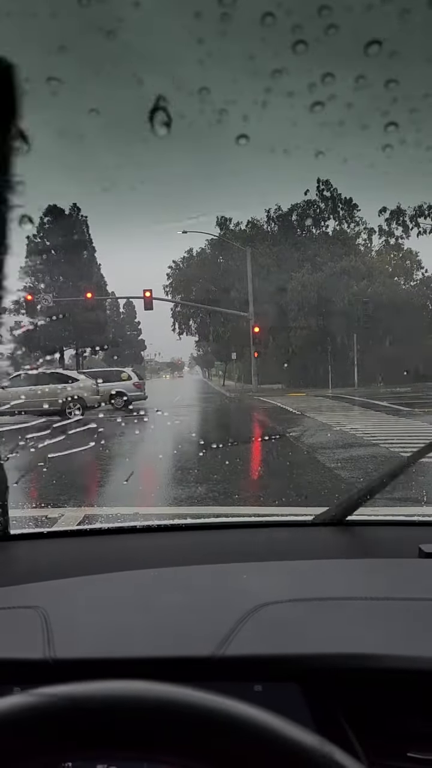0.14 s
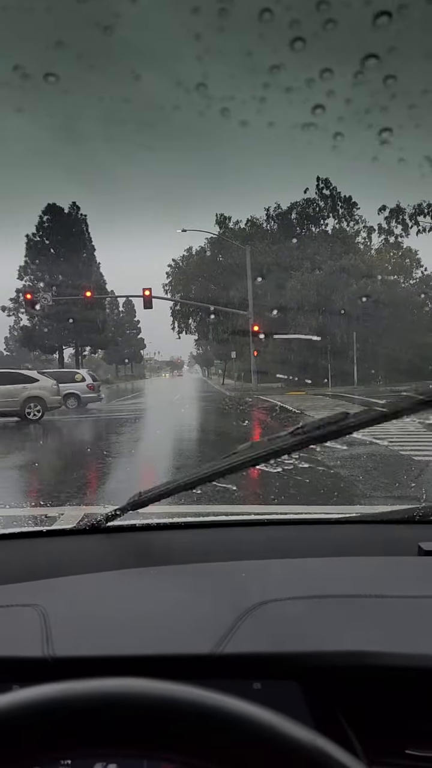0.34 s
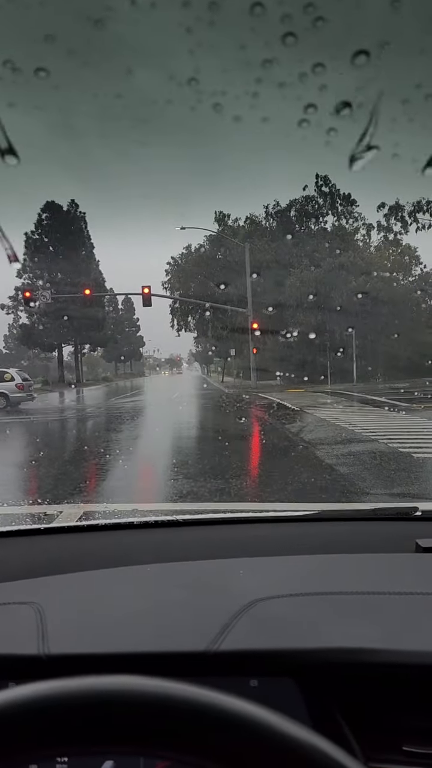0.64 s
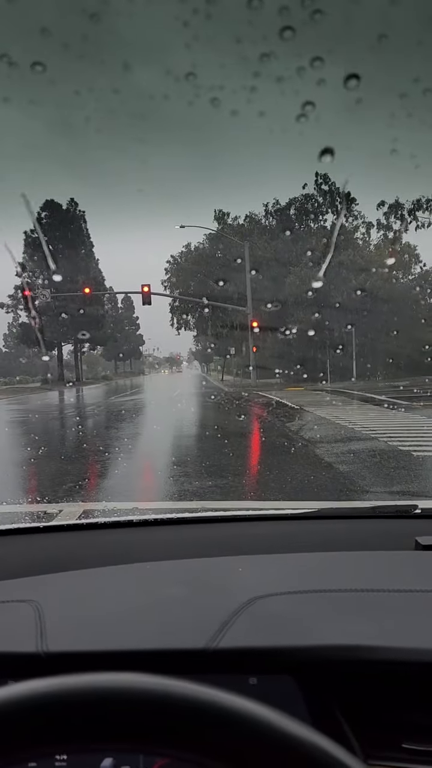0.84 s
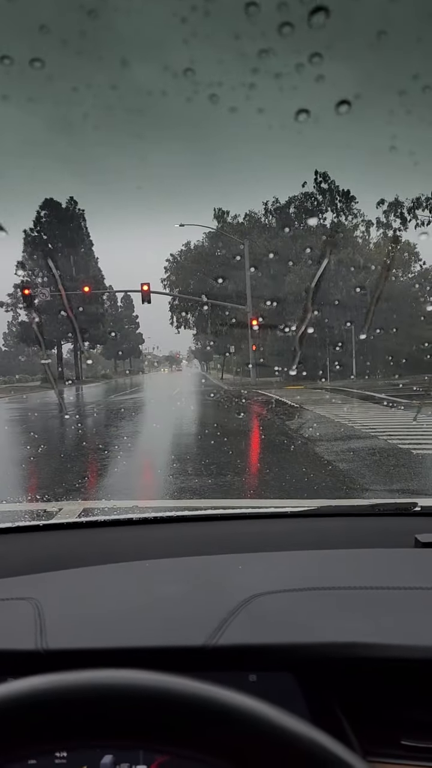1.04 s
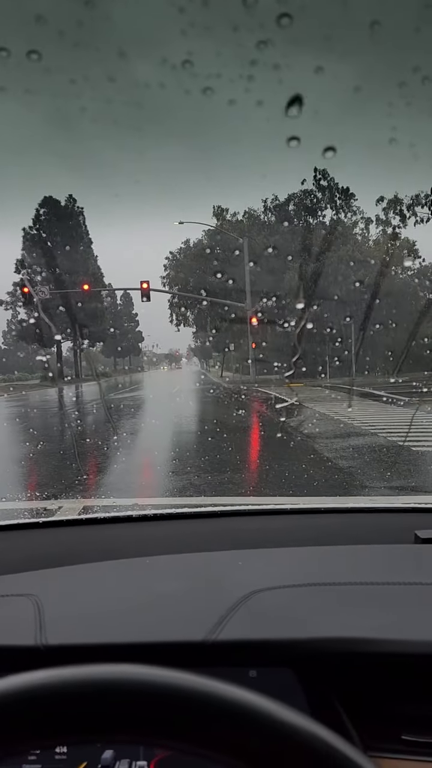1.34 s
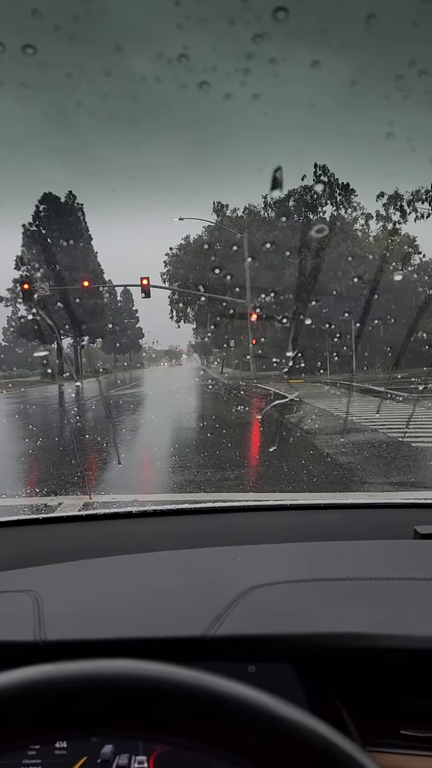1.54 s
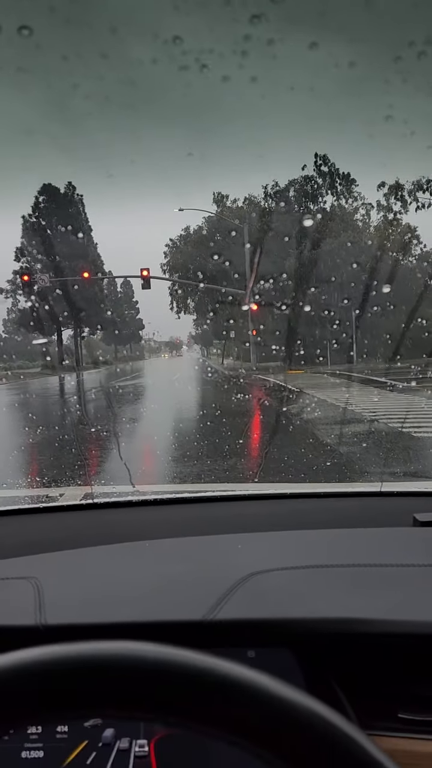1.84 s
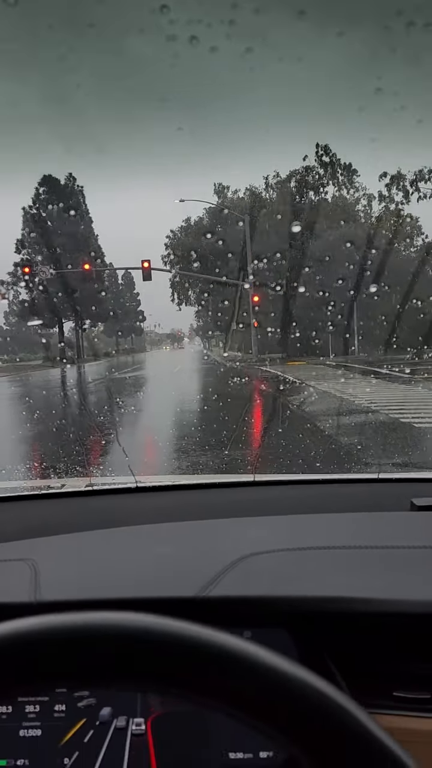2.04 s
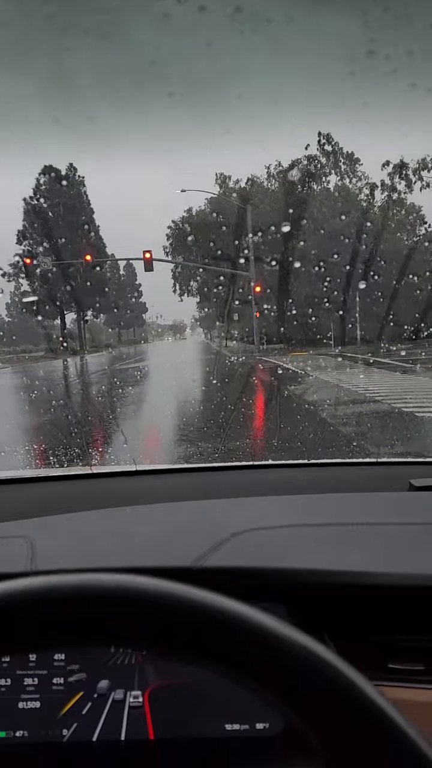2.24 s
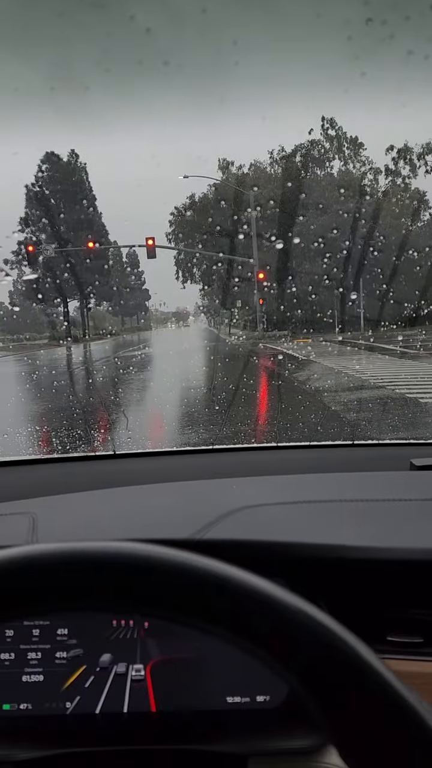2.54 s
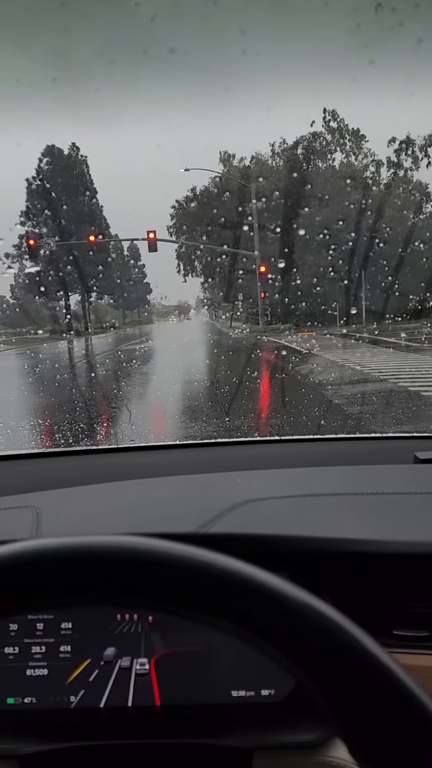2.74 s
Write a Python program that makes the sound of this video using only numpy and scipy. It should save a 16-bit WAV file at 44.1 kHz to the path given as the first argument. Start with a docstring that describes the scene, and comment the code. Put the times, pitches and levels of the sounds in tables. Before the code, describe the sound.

Heavy rain patters on a car's glass and roof over low cabin rumble, with one wiper swish

```python
"""Inside a quiet car rolling through heavy rain, heard at two microphone ports.
Left: rain on glass and roof is coloured noise with pattering drops and ticks; under it lie noise-made road boom,
a deep drone, bumps and knocks of decaying or swelling sines, and a low hum that comes and goes. One wiper sweep
is chattering noise, and a few faint squeaks are narrow-band noise.
Right: only air buffeting across the port, lumpy low noise with short swinging puffs."""
import sys
import numpy as np
from scipy import signal
from scipy.io import wavfile
from scipy.ndimage import uniform_filter1d

SR = 44100
rng = np.random.default_rng(int(sys.argv[2]) if len(sys.argv) > 2 else 0)


def log_audio(samples):
    """Write samples as a 16-bit WAV file to the path given in sys.argv[1]."""
    # one column per channel
    frames = np.atleast_2d(samples).T
    # limit to full scale, then quantise
    limited = np.clip(frames, -1, 1)
    pcm = np.round(limited * 32767).astype(np.int16)
    wavfile.write(sys.argv[1], SR, pcm)


def makeup_ratio(level_db):
    """Linear amplitude ratio for a level in decibels (20 dB per factor of ten)."""
    decades = np.asarray(level_db, float) / 20
    return 10 ** decades


N = 127890

# spectrum of rain through glass and roof: (f/Hz, level/dB per Hz)
RAIN_SPECTRUM = [(180, -87.5), (260, -98.5), (315, -69), (370, -80.5), (550, -81), (900, -84.5),
                 (1500, -87.5), (2500, -84.5), (3500, -88.5), (5000, -94.5), (6500, -96), (7700, -93),
                 (8500, -99), (9600, -116), (11500, -109), (15700, -111)]


def evened(x):
    """Scales a signal to an rms of one."""
    return x / np.sqrt(np.mean(x ** 2) + 1e-20)


def curve(points, at):
    """Reads a breakpoint table with straight lines between the points."""
    return np.interp(at, *np.transpose(points))


def add(mix, s, sound):
    """Adds a sound into the mix, in place, from second s on."""
    part = mix[round(max(s, 0) * SR):][:len(sound)]
    part += sound[:len(part)]


def sine(cycles):
    """A sine wave from its phase in cycles."""
    return np.sin(2 * np.pi * cycles)


def band(x, hz, width_hz):
    """A two-pole resonance applied twice."""
    b, a = signal.iirpeak(hz, hz / width_hz, SR)
    return signal.lfilter(b, a, signal.lfilter(b, a, x))


def coloured(x, spectrum, size, patchy_db=0, tilt_db=0):
    """Gives an even signal a spectrum in dB per Hz, with drifting patches and a tilt per octave about 4 kHz."""
    overlap = size * 3 // 4
    hz, _, z = signal.stft(x, SR, nperseg=size, noverlap=overlap)
    patches = uniform_filter1d(rng.standard_normal(z.shape), size=6, axis=0)
    patches = evened(uniform_filter1d(patches, size=6, axis=1))
    f, db = np.transpose(spectrum)
    shape = np.interp(np.log(hz + 1), np.log(f + 1), db)
    shape = shape + tilt_db * np.log2((hz + 1) / 4000)
    z = z * makeup_ratio(shape[:, None] + patchy_db * patches) * np.sqrt(SR / 2)
    return signal.istft(z, SR, nperseg=size, noverlap=overlap)[1][:N]


def flicker(seconds):
    """Smooth chance with the given grain length and an rms of one."""
    size = max(round(seconds * SR), 2)
    return evened(uniform_filter1d(uniform_filter1d(rng.standard_normal(N), size), size))


def patter(per_s, spread_db):
    """Noise switched on by drops of random size, each dying within milliseconds."""
    size_db = spread_db * np.minimum(rng.exponential(1, N), 3.5)
    hits = makeup_ratio(size_db) * (rng.random(N) < per_s / SR)
    envelope = signal.lfilter([1], [1, -0.94], hits)
    return evened(envelope * rng.standard_normal(N))


def rain(t):
    """A wash of far drops, a patter of near ones and bright spits, thickening and thinning together."""
    # density of the rain: (t/s, level/dB)
    shower = [(0, 0.5), (.5, 1), (1.0, 0.5), (1.5, -0.5), (2.0, 0.36), (2.5, -1.5), (2.9, -1)]
    wash = rng.standard_normal(N) * makeup_ratio(1.1 * flicker(0.014) + 0.2 * flicker(0.046))
    wash = coloured(wash, RAIN_SPECTRUM, size=1024, patchy_db=0.24)
    drops = coloured(patter(per_s=1000, spread_db=7), RAIN_SPECTRUM, size=256, tilt_db=-1.5)
    spits = coloured(patter(per_s=260, spread_db=2.8), RAIN_SPECTRUM, size=256, tilt_db=5.0)
    return makeup_ratio(curve(shower, t)) * (wash + makeup_ratio(-11) * drops + makeup_ratio(-10) * spits)


def road_boom(t):
    """Cabin boom: low noise that swells with the roughness of the road under the tyres."""
    # spectrum of the boom in the cabin: (f/Hz, level/dB per Hz)
    boom = [(10, -70), (22, -62), (32, -60), (44, -65), (64, -53), (77, -61), (90, -55), (103, -64),
            (130, -61), (155, -58), (175, -66), (200, -70), (250, -81), (400, -100), (700, -150)]
    # roughness of the road: (t/s, level/dB)
    roughness = [(0, 3), (.12, 4), (.22, 0), (.4, 4), (.55, 1), (.72, 4), (.85, -2), (1.2, -2), (1.6, 2),
                 (1.8, -2), (2.1, 0), (2.9, -2)]
    return makeup_ratio(curve(roughness, t)) * coloured(rng.standard_normal(N), boom, size=8192, patchy_db=1.2)


def drone(t):
    """A deep drone under the floor: one sine with a wavering level."""
    hz, rms_db, waver_db = 30.7, -41, 3
    level = makeup_ratio(rms_db + waver_db * flicker(.1))
    return level * np.sqrt(2) * sine(hz * t + rng.random())


def bumps():
    """Bumps that set a cabin resonance swinging: sines under a flat-topped swell."""
    # one row per bump: (start t/s, length/s, f/Hz, peak level/dB)
    thumps = [(.012, .05, 60, -18), (0., .04, 155, -16.5), (.05, .04, 165, -31), (.28, .045, 145, -24),
              (.345, .03, 150, -27), (.3, .14, 63, -28), (.7, .07, 125, -31), (.725, .055, 70, -25),
              (1.29, .08, 64, -25), (1.398, .072, 143, -23.5), (1.41, .11, 63, -24)]
    out = np.zeros(N)
    for s, length, hz, db in thumps:
        u = np.arange(0, length, 1 / SR)
        swell = np.minimum(1.88 * np.sin(np.pi * u / length), 1)
        add(out, s, makeup_ratio(db) * swell * sine(hz * u))
    return out


def knocks(t):
    """Dull knocks in the trim: a few panel modes ring and decay, slightly detuned at each knock."""
    # one row per knock: (start t/s, level/dB before the mode levels)
    hits = [(.0, -38), (.102, -41), (.187, -30), (.228, -39), (.258, -36), (.285, -34), (.432, -37),
            (.697, -35), (1.391, -32), (1.525, -38)]
    # modes of the trim: (f/Hz before detuning, level/dB within a knock, time to fall 60 dB/s)
    modes = [(196.2, 2.5, 0.13), (261.5, -4, 0.12), (308, -4, 0.18), (400.5, -2, 0.11), (536, -8.5, 0.11),
             (682, -15, 0.081)]
    rise_s = .002
    out, u = np.zeros(N), t[:SR // 5]
    rise = np.minimum(u / rise_s, 1)
    detunes = rng.uniform(.94, 1.06, (len(hits), len(modes)))
    for (s, db), detune in zip(hits, detunes):
        ring = np.zeros(len(u))
        for (hz, mode_db, t60), d in zip(modes, detune):
            ring += makeup_ratio(mode_db - 60 * u / t60) * sine(hz * d * u)
        add(out, s, makeup_ratio(db) * rise * ring)
    return out


def buffeting(t):
    """Air buffeting the right port: lumpy low turbulence following the air flow."""
    # spectrum of the turbulence: (f/Hz, level/dB per Hz)
    turbulence = [(10, -42), (22, -35.5), (36, -32), (60, -37.5), (72, -33), (85, -37), (100, -42),
                  (125, -54), (200, -68), (300, -81), (400, -92), (560, -94), (750, -103), (1000, -111),
                  (1400, -115), (2000, -121), (3000, -126), (5000, -132), (10200, -140), (11500, -112),
                  (15000, -124)]
    # strength of the air flow: (t/s, level/dB)
    flow = [(0, 1), (.3, -2.5), (.6, -2.5), (.9, 0), (1.2, -3.5), (1.5, -2), (1.8, -3), (1.92, 3.5),
            (2.0, -4), (2.09, -1), (2.22, 0.5), (2.31, 1.5), (2.43, -2.5), (2.55, 2.5), (2.68, -3),
            (2.9, 2)]
    lumps = makeup_ratio(1.63 * flicker(.035)) * rng.standard_normal(N)
    return makeup_ratio(curve(flow, t)) * coloured(lumps, turbulence, size=8192, patchy_db=.5)


def wiper(t):
    """A wiper blade pressing water across the glass: a wet swish that chatters as the blade drags."""
    # strength of the sweep: (t/s, level/dB over the rain spectrum, before the blade colour)
    sweep = [(.11, -19.5), (.15, 3), (.178, 5), (.186, 12.5), (.203, 8), (.211, 11), (.22, 9), (.243, 10.5),
             (.258, 6), (.282, 3.5), (.295, 5.5), (.312, -4), (.38, -8.5)]
    # colour of the wet blade relative to the rain: (f/Hz, level/dB)
    blade = [(150, -6), (400, 1), (600, -4), (1200, -3), (1700, -5), (2600, 2), (3500, 4), (4500, 1.5),
             (5200, 0), (6000, 2), (8000, 3), (12000, 3)]
    hz = sorted(f for f, _ in RAIN_SPECTRUM + blade)
    colour = list(zip(hz, curve(RAIN_SPECTRUM, hz) + curve(blade, hz)))
    chatter_db, judder_db = 2 * flicker(0.0015), 1.96 * flicker(.004)
    sweeping = (t > sweep[0][0]) * (t < sweep[-1][0])
    stroke = makeup_ratio(curve(sweep, t) + chatter_db + judder_db) * sweeping
    return stroke * coloured(rng.standard_normal(N), colour, size=256, patchy_db=1.0)


def ticks(t):
    """Single large drops ticking on the windscreen: decaying noise bursts, only the top treble kept."""
    # one row per drop: (start t/s, level/dB before the lift and the high-pass)
    large_drops = [(0.1814, -52), (0.4913, -54), (0.5247, -56), (1.1383, -63), (1.2426, -64), (1.28, -63),
                   (1.3149, -60), (1.3748, -60), (1.3937, -66), (1.6681, -61.5), (2.1311, -61),
                   (2.3486, -57), (2.6658, -58)]
    t60_s, lift_db, low_hz = 0.024, 8, 11900
    out, u = np.zeros(N), t[:SR // 20]
    for s, db in large_drops:
        add(out, s, makeup_ratio(db + lift_db - 60 * u / t60_s) * rng.standard_normal(len(u)))
    return signal.lfilter(*signal.butter(4, low_hz, "high", fs=SR), out)


def puffs(t):
    """Sharp puffs at the right port: each a few swings of the port with a little dull hiss."""
    # one row per puff: (centre t/s, level/dB of the main swing, half-width/s to 1/e)
    gusts = [(.228, -44, 0.0056), (0.458, -45.5, 0.0036), (.558, -55, 0.0023), (.765, -45.5, 0.005),
             (1.618, -40, 0.0033), (1.691, -40.5, 0.0021), (1.828, -36.5, 0.0019), (1.921, -58, .004),
             (2.297, -51, 0.0035), (2.727, -50, 0.0021), (2.808, -41.5, 0.0057)]
    port_hz, spread = 485, 0.082
    hiss = evened(signal.lfilter([1], [1, -1.8, .81], rng.standard_normal(N)))
    out = np.zeros(N)
    for (s, db, w), (a, b) in zip(gusts, rng.random((len(gusts), 2))):
        u = t - s
        hz = port_hz * (1 + spread * (2 * a - 1))
        swing = sine(hz * u + b)
        swing = swing + 0.67 * sine(0.5 * hz * u + a)
        swing = swing + 0.45 * sine(1.4 * hz * u + a + b)
        out += makeup_ratio(db) * np.exp(-(u / w) ** 2) * (swing + makeup_ratio(-21) * hiss)
    return out


def squeaks(t):
    """Faint thin squeaks high in the treble: narrow fuzzy whistles of band-passed noise."""
    # one row per squeak: (start t/s, length/s, f/Hz, rms level/dB at the height of the swell)
    whistles = [(0.768, 0.063, 11600, -70.5), (2.313, .08, 12000, -70), (2.58, 0.045, 11900, -71)]
    noise = rng.standard_normal(N)
    out = np.zeros(N)
    for s, length, hz, db in whistles:
        swell = np.sin(np.pi * np.clip((t - s) / length, 0, 1))
        out += makeup_ratio(db) * swell * evened(band(noise, hz, width_hz=500))
    return out


def hum(t):
    """A low hum that comes and goes: one steady sine faded in and out."""
    # one row per spell: (start t/s, end t/s, rms level/dB)
    spells = [(.88, 1.36, -36), (2.46, 3.0, -37)]
    hz, fade_s = 119, .05
    level = np.zeros(N)
    for start, end, db in spells:
        level += makeup_ratio(db) * np.clip(np.minimum(t - start, end - t) / fade_s, 0, 1)
    return level * np.sqrt(2) * sine(hz * t + rng.random())


def scene():
    """Left port: the cabin sounds; right port: the moving air."""
    t = np.arange(N) / SR
    road = road_boom(t) + drone(t) + bumps() + knocks(t) + hum(t)
    left = rain(t) + ticks(t) + road + wiper(t) + squeaks(t)
    right = buffeting(t) + puffs(t)
    return np.array([left, right])


def low_pass(x):
    """Removes everything above the highest recorded frequency."""
    return signal.sosfilt(signal.butter(12, 15830, fs=SR, output="sos"), x)


def record(dry):
    """Takes the two ports as the finished mix."""
    return low_pass(dry)


dry = scene()
out = record(dry)
log_audio(out)
```